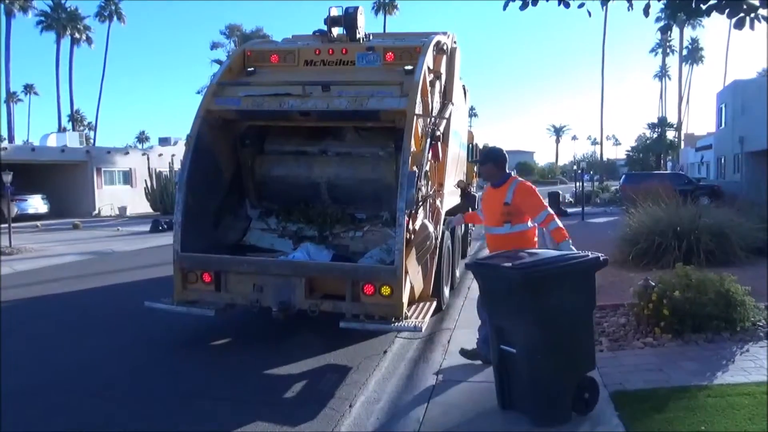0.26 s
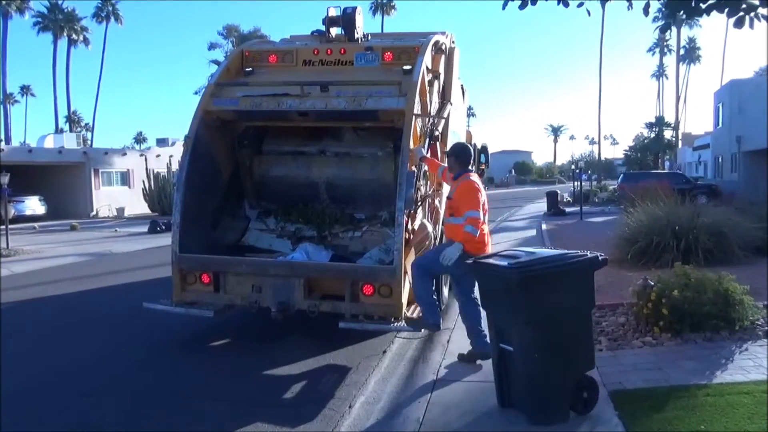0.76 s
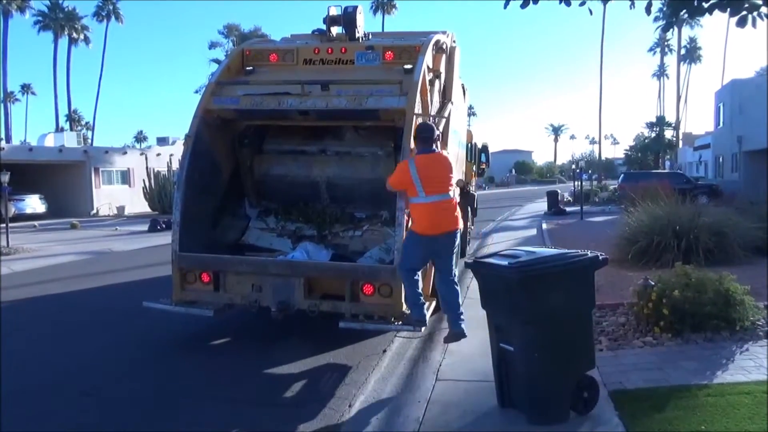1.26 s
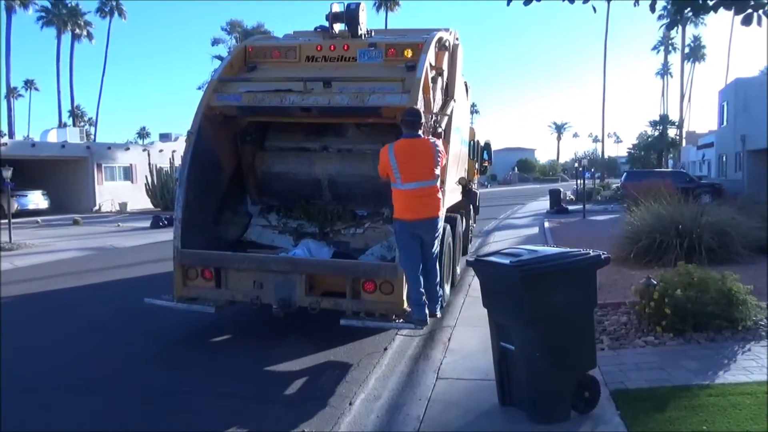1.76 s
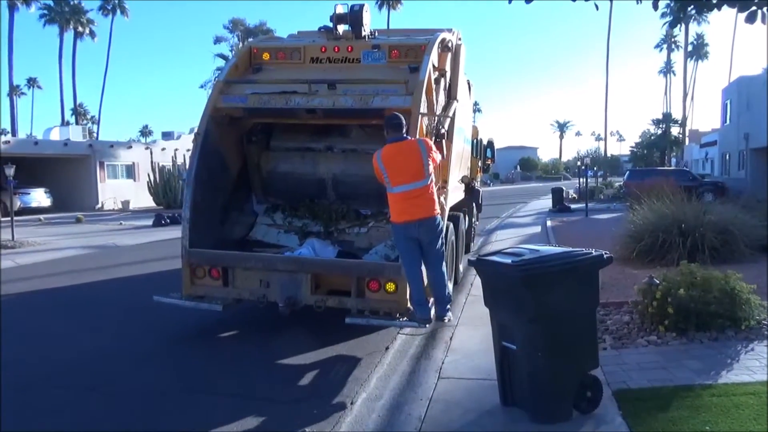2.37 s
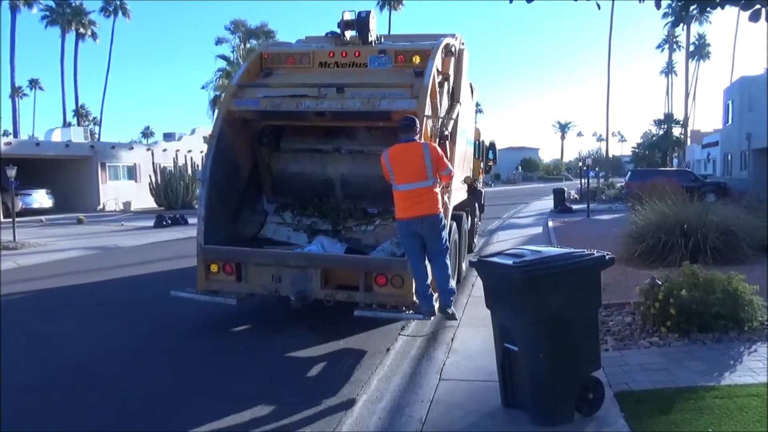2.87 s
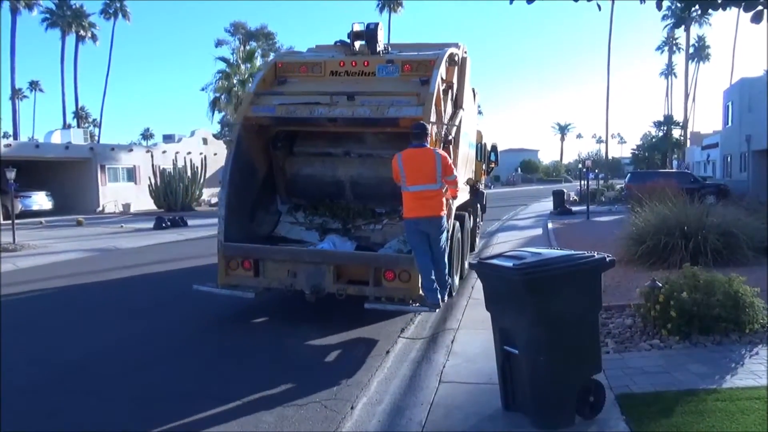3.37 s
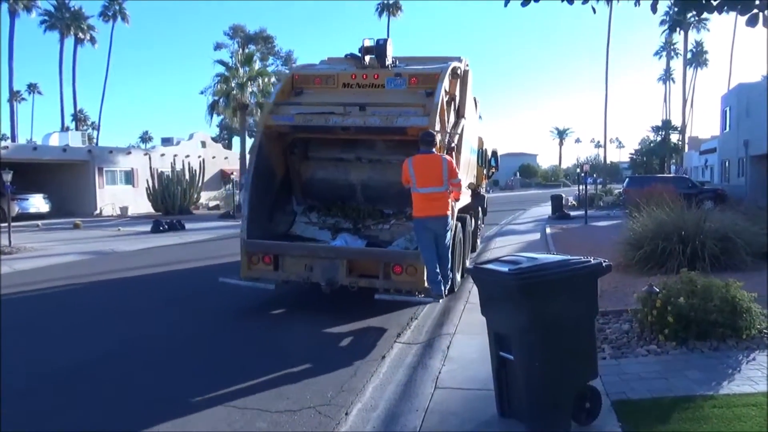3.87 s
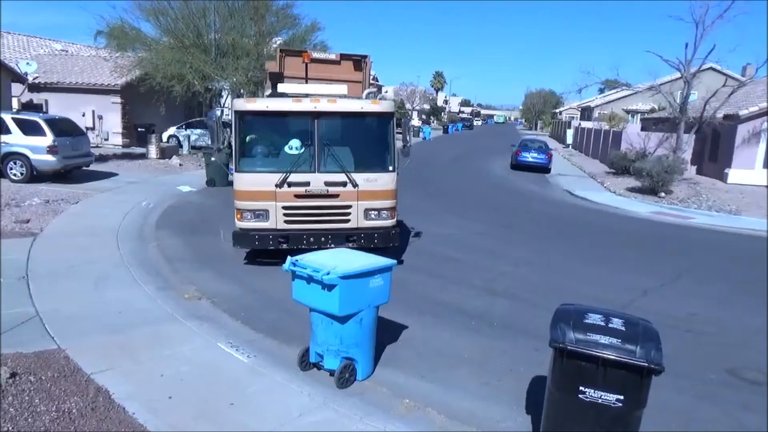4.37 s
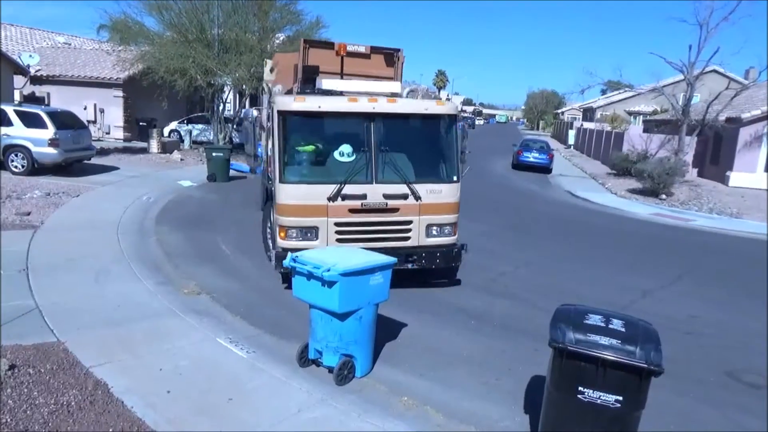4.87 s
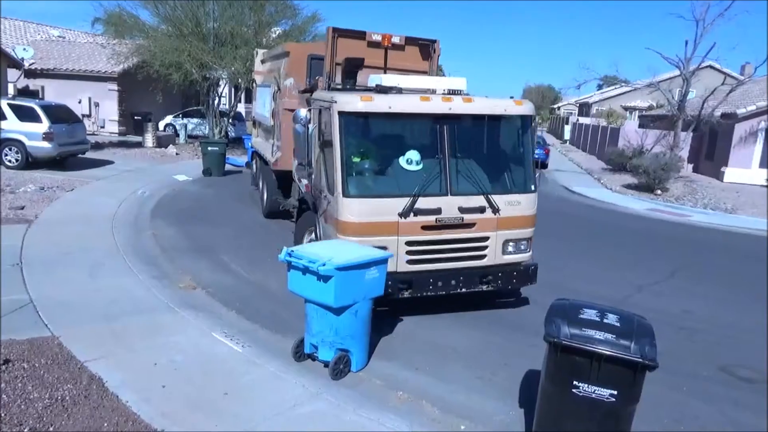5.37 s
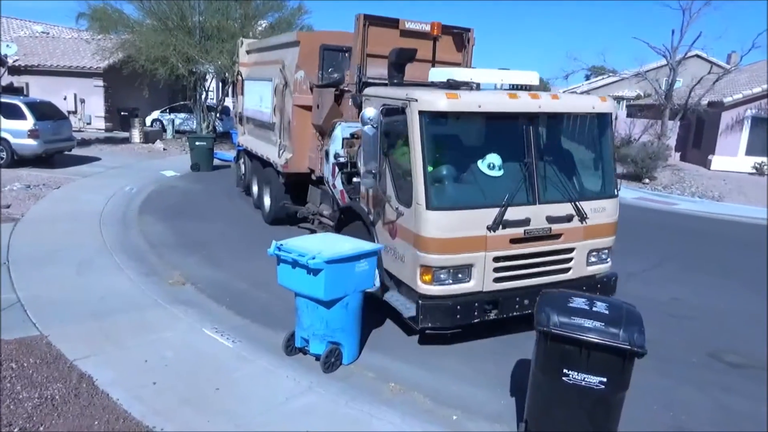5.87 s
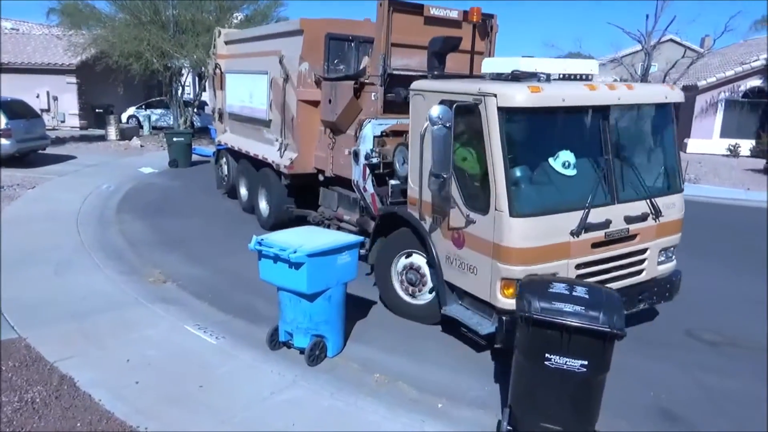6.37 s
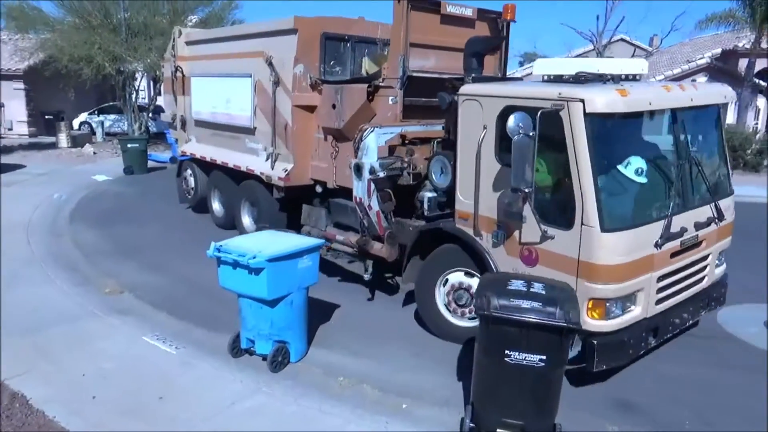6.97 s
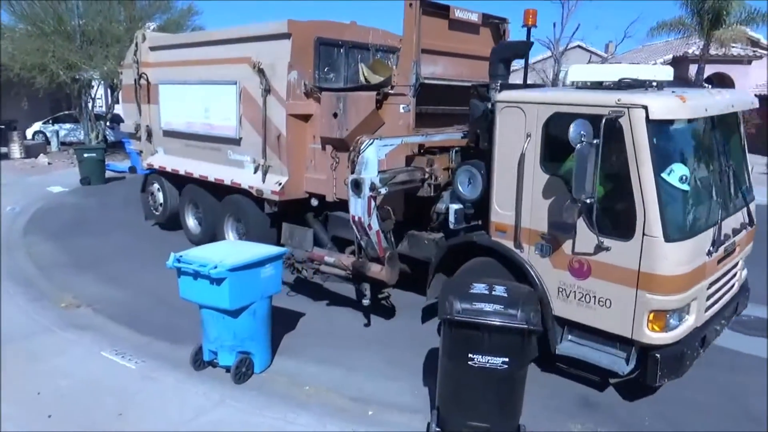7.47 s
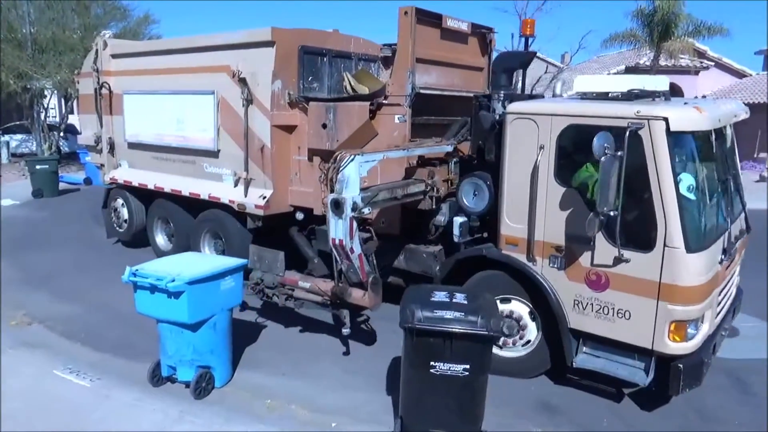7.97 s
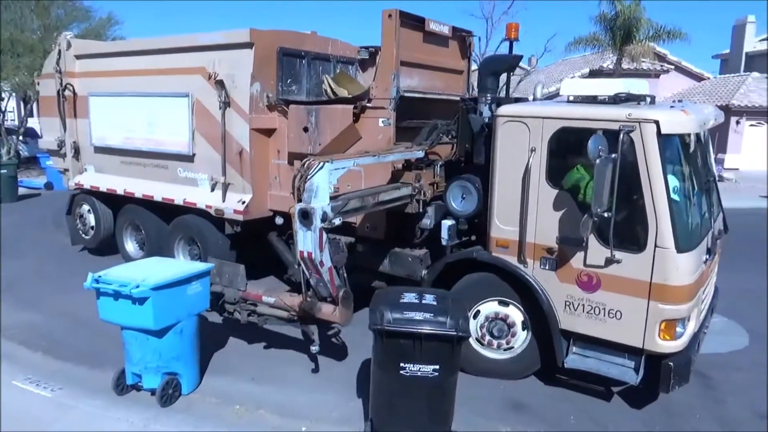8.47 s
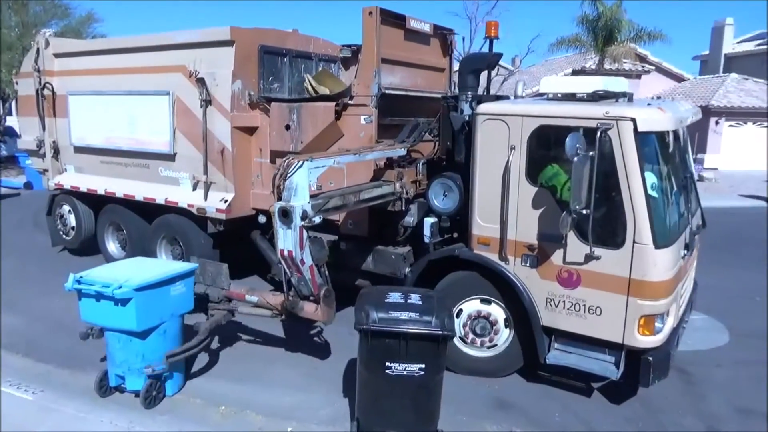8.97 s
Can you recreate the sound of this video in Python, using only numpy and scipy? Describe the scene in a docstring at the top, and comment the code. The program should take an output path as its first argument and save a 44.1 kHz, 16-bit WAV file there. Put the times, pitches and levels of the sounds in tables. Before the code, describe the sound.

A rear-loading garbage truck drones and bangs, sags, revs and pulls away; after a brief silence a second truck rattles up and brakes squealing.

```python
"""A street, with two diesel refuse trucks passing through it one after the other.
A rear loader drones at raised speed: shaft harmonics are weighted by exhaust resonances over filtered noise.
Its packer bangs and air hisses; the engine sags, then revs through the resonances and pulls away.
After a short silence a side loader rolls past close by, its clatter following distance and its gears whining.
It brakes to a stop with puffs of noise and bent-tone squeals, and its arm starts to move."""
import sys
import numpy as np
from scipy import signal
from scipy.fft import rfft, irfft, next_fast_len
from scipy.io import wavfile
from scipy.ndimage import uniform_filter1d

SR = 44100
rng = np.random.default_rng(int(sys.argv[2]) if len(sys.argv) > 2 else 0)


def unload_audio(sound):
    """Save the sound as a 16-bit wav file, at the path given as the first command line argument."""
    columns = np.transpose(np.atleast_2d(sound))
    # keep every value between -1 and 1, then stretch to whole-number steps
    steps = np.round(np.clip(columns, -1, 1) * 32767)
    wavfile.write(sys.argv[1], SR, steps.astype(np.int16))


N = 406602
LENGTH = next_fast_len(N, True)  # transform length in samples
T, HZ = np.arange(N) / SR, np.fft.rfftfreq(LENGTH, 1 / SR)
FIRST_ENDS_S, SECOND_STARTS_S = 4.236, 4.416

REAR_RUMBLE_DB, REAR_CLATTER_DB = -26, -38  # at the starting speed, before strain

# rear loader's engine speed: (t/s, firing rate f/Hz)
REAR_SPEED = [(0, 133.2), (.5, 133.3), (1.1, 136.1), (1.8, 137), (2.06, 135.5), (2.3, 121.3), (2.58, 108.7),
              (3.0, 156.2), (3.32, 179.9), (3.74, 163.6), (4.12, 165), (4.22, 157.7)]
# harmonics of the firing rate, from the first up: (level/dB)
DRONE_HARMONICS = [0, -16, -31]
# gears and pump: (multiple of the firing rate, level/dB at the starting speed)
GEAR_TONES = [(4.71, -45), (8.06, -47), (9.47, -47)]
# spectrum of the rumble: (f/Hz, level/dB)
REAR_RUMBLE_SPECTRUM = [(25, -24), (75, -1.5), (120, 2), (200, 3), (270, -1), (350, -1), (450, -16.5),
                        (2000, -64)]
# spectrum of the clatter: (f/Hz, level/dB)
REAR_CLATTER_SPECTRUM = [(250, -12), (480, -9), (640, -5.5), (850, -5.5), (1150, -8.5), (1700, -10.5),
                         (2700, -14.5), (3500, -13), (4600, -20.5), (6500, -25), (8700, -21),
                         (11000, -35.5)]
# low shudder of the chassis as the truck moves off: (t/s, level/dB)
CHASSIS_SHUDDER = [(2.2, -65.5), (2.65, -30.5), (3.25, -29.5), (3.9, -47)]


def rear_engine():
    """Harmonic synthesis: exhaust drone and gear tones share one shaft, over rumble and firing clatter."""
    hz = curves(REAR_SPEED)[0]
    drone_db, rumble_db, clatter_db = rear_levels(hz)
    turns = np.cumsum(hz * (1 + 0.00478 * drift(hz=20))) / SR  # counted in firings

    uneven = 1 + 0.158 * drift(hz=30.544)  # no two firings are equally strong
    drone = sum(amp(db) * np.sin(2 * np.pi * ((k + 1) * turns + rng.random()))
                for k, db in enumerate(DRONE_HARMONICS))
    gears = sum(amp(db + 2 * drift(hz=11)) * np.sin(2 * np.pi * k * turns) for k, db in GEAR_TONES)
    gear_gain = amp(0.21 * (clatter_db - REAR_CLATTER_DB))
    tones = np.sqrt(2) * (amp(drone_db) * uneven * drone + gear_gain * gears)

    beat = 1 + 0.15 * firing(turns, length=0.21)
    rumble = amp(rumble_db) * coloured(noise(side_db=-10) * beat, shape(REAR_RUMBLE_SPECTRUM))
    rattle = noise(side_db=-8.5) * beat * amp(0.92 * drift(hz=31.205))
    body = shape(REAR_CLATTER_SPECTRUM) * panels(depth_db=2.0, spacing_hz=35.136)
    clatter = amp(clatter_db) * coloured(rattle, body, band=(1300, 4000))

    # a slow shaft shakes the frame once and twice a turn
    sway = 2 * np.pi * turns * 0.31 + 0.63 * drift(hz=11.0)
    shudder_gain = amp(curves(CHASSIS_SHUDDER)[0]) * (1 + .5 * drift(hz=15))
    shudder = shudder_gain * (np.sin(sway) + np.sin(2 * sway))
    return tones + rumble + clatter + shudder


COAST_DB_PER_HZ_S = 0.0242  # the drone softens while the revs fall
RUMBLE_DB_PER_OCTAVE, CLATTER_DB_PER_OCTAVE = 2, 16.5  # growth with engine speed
LIFT_DB, LIFT_CLOSE_S, LIFT_T60_S = -10.5, 0.066, .25

# exhaust resonances, where the drone swells: (centre f/Hz, width f/Hz, level/dB)
EXHAUST_RESONANCES = [(116.97, 4.4, -18), (139.43, 4.83, -11.5), (163.83, 5.83, -12.5), (174.5, 9.7, -17)]
# the throttle closes for a moment and the drone drops away: (start t/s, length t/s)
THROTTLE_LIFTS = [(2.071, 0.258), (2.496, 0.277), (4.116, 0.13)]


def rear_levels(hz):
    """Resonance: exhaust peaks weight the drone, as speed, throttle and strain set the levels in dB."""
    pipe = sum(amp(db) ** 2 / (1 + (2 * (hz - centre) / width) ** 2)
               for centre, width, db in EXHAUST_RESONANCES)
    slowing = uniform_filter1d(np.maximum(-np.gradient(hz) * SR, 0), size=SR // 16)
    lifted = sum(swell(start, length, LIFT_CLOSE_S, LIFT_T60_S) for start, length in THROTTLE_LIFTS)
    drone_db = 10 * np.log10(pipe) - COAST_DB_PER_HZ_S * slowing + LIFT_DB * lifted

    octaves = np.log2(hz / hz[0])
    rumble_db = louder(REAR_RUMBLE_DB + RUMBLE_DB_PER_OCTAVE * octaves, strain_powers()[1])
    clatter_db = REAR_CLATTER_DB + CLATTER_DB_PER_OCTAVE * octaves
    return drone_db, rumble_db, clatter_db


# packer and body under load: (start t/s, length t/s, grinding level/dB, rumble level/dB)
BODY_STRAINS = [(.22, 0.065, -33.5, -19), (2.13, 0.27, -24.5, -28.5), (2.6, 0.51, -29.5, -28.5),
                (3.13, 0.39, -24.5, -20.5), (4.03, 0.113, -26.5, -22)]


def strain_powers():
    """Power summation: overlapping strains add as grinding power and rumble power."""
    return efforts(BODY_STRAINS, rise=0.107, t60=1.2)


# spectrum of the packer's grinding: (f/Hz, level/dB)
GRIND_SPECTRUM = [(200, -13.5), (355, -2), (480, -16.5), (740, -6), (1000, -7), (1350, -17), (3500, -27.5),
                  (9000, -38.5)]


def packer():
    """Sliding friction: steel slides and judders under load, its noise shaped by panel resonances."""
    rub = noise(side_db=-9) * amp(drift(hz=59.23))
    body = shape(GRIND_SPECTRUM) * panels(depth_db=2.5, spacing_hz=24.88)
    return np.sqrt(strain_powers()[0]) * coloured(rub, body)


TEETH_PER_FIRING = 32

# side loader's gear whine, which follows engine speed: (t/s, f/Hz)
GEAR_WHINE = [(4.4, 1405), (5.8, 1258), (6.4, 1247), (7.1, 1211), (7.6, 1227), (8.3, 1212)]
# its turbocharger runs down: (t/s, f/Hz, level/dB)
TURBO_RUNDOWN = [(5.4, 8780, -68), (5.85, 8300, -34), (6.15, 7680, -36), (7.1, 7250, -41), (7.3, 7080, -75)]
# spectrum of the side loader's body: (f/Hz, level/dB)
SIDE_SPECTRUM = [(25, -8), (45, -7.5), (80, -5), (140, -2), (210, -1.5), (300, -1), (450, -6), (660, 0),
                 (950, -2.5), (1260, -2), (1850, -6.5), (2700, -7), (3700, -12), (8100, -9.5),
                 (11000, -18.5)]


def side_engine():
    """Amplitude modulation: each firing rattles block and panels; gears and turbocharger sing above."""
    hz = curves(GEAR_WHINE)[0]
    rumble_db, clatter_db, whine_db, octave_db = side_levels()
    turns = np.cumsum(hz / TEETH_PER_FIRING * (1 + 0.014 * drift(hz=2))) / SR  # counted in firings
    rattle = (1 + 0.214 * firing(turns, length=0.416)) * amp(0.7 * drift(hz=198.16))

    # power shares of the bass and the treble
    body = shape(SIDE_SPECTRUM)
    low, high = 1 / (1 + (HZ / 370) ** 6), 1 / (1 + (3500 / (HZ + 1)) ** 6)
    rumble = coloured(noise(side_db=-13) * rattle, body * np.sqrt(low), band=(30, 350))
    rumble = amp(rumble_db + 3.0) * rumble
    throb = amp(rumble_db - 10.0) * np.sin(4 * np.pi * turns)  # exhaust hum at twice the firing rate

    # as the truck passes, the ringing panels of its front give way to those of its side
    aspect = np.pi / 2 * np.clip((T - SECOND_STARTS_S) / (STOP_S - SECOND_STARTS_S), 0, 1)
    middle = body * np.sqrt((1 - low) * (1 - high))
    faces = [middle * panels(depth_db=1.5, spacing_hz=22) for _ in range(2)]
    front, flank = (coloured(noise(side_db=-11) * rattle, face, band=(400, 3200)) for face in faces)
    surge_db = 0.545 * drift(hz=8.1)  # the load on the engine comes in small surges
    clatter = amp(clatter_db + surge_db) * (np.cos(aspect) * front + np.sin(aspect) * flank)

    # the treble grows faster than the clatter as the truck comes near
    fizz = noise(side_db=-13.5) * rattle * (1 + 0.193 * ticks(per_s=6.3, ring_s=0.0036))
    fizz = amp(1.1416 * clatter_db - 5.5) * coloured(fizz, body * np.sqrt(high))

    tones = whistle(hz, whine_db, waver=0.005123)
    tones = tones + whistle(2 * hz, octave_db, waver=0.0048)
    tones = tones + whistle(*curves(TURBO_RUNDOWN), waver=0.0038)
    return rumble + throb + clatter + fizz + street(tones, wet_db=-5.5, t60=1.0)


# the truck rolls by at an even speed, then brakes to a stop
AHEAD_M, PASSING_M, ROLL_M_PER_S = 6.737, 3.924, 3.141
BRAKE_S, STOP_S = 7.696, 7.7
SIDE_CLATTER_DB, SIDE_RUMBLE_DB, OCTAVE_DB = -18.5, -33, -42  # at the nearest point, before loads
WHINE_DB = -12  # relative to the unloaded clatter
RUMBLE_FALL_DB_PER_M = 0.37  # the rumble leaves through the grille and fades as that goes by
OCTAVE_GAIN_DB_PER_M = 1.28  # the whine's octave grows as the side of the truck comes into view
LOAD_RISE_S, LOAD_T60_S = 0.065, 1

# hydraulics load the engine: (start t/s, length t/s, added clatter level/dB, added rumble level/dB)
HYDRAULIC_LOADS = [(6.4, 0.42, -23.5, -33), (8.43, 0.169, -17.5, -42), (9.0, 0.165, -18.5, -23)]
# the octave of the whine sings out once before the stop: (start t/s, length t/s, level/dB)
OCTAVE_SINGING = [(7.04, .29, -28)]


def side_levels():
    """Inverse distance law: clatter and whine follow range; rumble and octave follow position, in dB."""
    speed = ROLL_M_PER_S * np.clip((STOP_S - T) / (STOP_S - BRAKE_S), 0, 1) * (T >= SECOND_STARTS_S)
    past_m = np.cumsum(speed) / SR - AHEAD_M  # negative while approaching
    near_db = SIDE_CLATTER_DB + 20 * np.log10(PASSING_M / np.hypot(past_m, PASSING_M))
    clatter_load, rumble_load = efforts(HYDRAULIC_LOADS, LOAD_RISE_S, LOAD_T60_S)
    singing = efforts(OCTAVE_SINGING, LOAD_RISE_S, LOAD_T60_S)[0]

    rumble_db = louder(SIDE_RUMBLE_DB - RUMBLE_FALL_DB_PER_M * past_m, rumble_load)
    octave_db = louder(OCTAVE_DB + OCTAVE_GAIN_DB_PER_M * past_m, singing)
    return rumble_db, louder(near_db, clatter_load), near_db + WHINE_DB, octave_db


def whistle(hz, db, waver):
    """Rotor tone: a sine at the passing rate, wavering in pitch and strength."""
    turns = np.cumsum(hz * (1 + waver * drift(hz=39.29))) / SR
    return np.sqrt(2) * amp(db + 2.93 * drift(hz=13.3)) * np.sin(2 * np.pi * turns)


SQUEAL_SWELL_S = .04  # or half the squeal, if that is shorter
BEND_RADIANS = 2.892  # the pitch arches away and most of the way back
STEADY_JITTER, JITTER_PER_BEND = .0006, .18  # rms share of the pitch; growth per relative bend

# brakes and dry pivots: (start t/s, length t/s, pitch f/Hz, bend f/Hz, peak level/dB before flutter)
BRAKE_SQUEALS = [(1.57, .1, 2000, 30, -33), (3.28, .11, 6020, 50, -20.5), (3.34, .11, 6020, 180, -19),
                 (3.405, .085, 6060, -80, -22), (3.45, .21, 5990, -70, -31), (4.03, .055, 6100, 400, -30),
                 (6.11, .11, 7560, -50, -27), (6.21, .075, 8680, -50, -26), (7.095, .09, 8570, -90, -10),
                 (7.165, .08, 8740, 130, -21), (7.21, .06, 9020, 60, -17.5), (7.62, .09, 9250, -40, -21),
                 (7.235, .395, 7555, 55, -11.5), (7.585, .24, 7590, -25, -11.5),
                 (7.78, .16, 7540, 40, -18.5), (7.915, .06, 9330, -30, -22), (7.945, .18, 6470, 15, -16),
                 (7.99, .075, 6480, 5, -4), (8.025, .09, 8810, -70, -18), (8.055, .085, 8530, 90, -13),
                 (8.06, .12, 9190, -30, -14), (8.14, .295, 9180, 25, -12), (8.08, .16, 7710, 25, -16.5),
                 (8.12, .15, 7510, 30, -18), (8.22, .19, 7740, 20, -20), (8.14, .08, 6925, 20, -12.5),
                 (8.205, .21, 8025, 10, -21), (8.23, .19, 8713, 10, -17), (8.23, .14, 10230, 110, -22),
                 (8.31, .19, 5762, -10, -24), (8.35, .095, 5757, 0, -9), (8.44, .05, 8030, 30, -19)]


def squeals():
    """Stick-slip: rubbing steel catches on successive modes; each swells, bends, flutters and lets go."""
    out = np.zeros(N)
    jitter, wander = drift(hz=260), 1 + .0008 * drift(hz=12)
    flutter = amp(1.2 * drift(hz=20))
    for start, length, hz, bend_hz, db in BRAKE_SQUEALS:
        at = (T >= start) & (T < start + length)
        shift = rng.integers(N)  # each squeal takes its own stretch of chance
        rough = STEADY_JITTER + JITTER_PER_BEND * abs(bend_hz) / hz
        arch = hz + bend_hz * np.sin(np.linspace(0, BEND_RADIANS, at.sum()))
        pitch = arch * np.roll(wander + rough * jitter, shift)[at]
        grip = signal.windows.tukey(at.sum(), 2 * SQUEAL_SWELL_S / length) * np.roll(flutter, shift)[at]
        out[at] += amp(db) * grip * np.sin(2 * np.pi * np.cumsum(pitch) / SR)
    return street(out, wet_db=-13, t60=.4)


KNOCK_S, CRACK_T60_S = .3, 0.0752
CROWDING = 0.1025  # each mode is a cluster of close ones: its width as a share of its pitch

# blows; the large panels boom low: (t/s, ring level/dB, crack level/dB, main pitch f/Hz)
STEEL_KNOCKS = [(.007, -25, -27.5, 892.5), (.048, -11.5, -40, 823), (.225, -18, -24, 683),
                (.257, -12, -35, 640.4), (.281, -16.5, -46, 879.5), (.302, -18.5, -30, 696),
                (.318, -12, -28, 750), (.359, -16.5, -34.5, 885), (1.75, -19, -21.5, 750.7),
                (3.209, -20.5, -21.5, 748), (3.6, -21, -21.5, 764.5), (4.05, -16.5, -41.5, 764),
                (4.122, -12, -36.5, 315.8), (4.188, -14.5, -30.5, 328.7), (6.385, -10, -39, 228.5),
                (6.882, -11, -37, 289), (6.953, -11, -39.5, 297.2), (7.013, -14, -19.5, 797),
                (8.428, -14, -14, 791.5), (8.701, -30, -15.5, 750), (9.008, -30, -17, 751)]
# modes of a struck panel: (multiple of the main pitch, level/dB, t60 t/s)
PANEL_MODES = [(0.611, -15, 0.17), (0.881, -7.5, .08), (0.998, -4, 0.095), (1.21, -12, 0.145),
               (1.7, -10, 0.076), (2.3, -15, 0.072)]
# spectrum of the crack: (f/Hz, level/dB)
CRACK_SPECTRUM = [(80, -8), (500, -2.5), (1500, 6.5), (3300, 4.5), (11000, -8.5)]


def knocks():
    """Modal synthesis: a blow cracks and rings the crowded modes of a steel panel; the street echoes both."""
    ring, crack = np.zeros((2, N))
    for s, ring_db, crack_db, main_hz in STEEL_KNOCKS:
        at = (T >= s) & (T < s + KNOCK_S)
        t = T[at] - s
        for ratio, db, t60 in PANEL_MODES:
            hz = ratio * main_hz
            # a random walk in phase spreads the mode over its width
            walk = np.cumsum(rng.standard_normal(len(t))) * np.sqrt(CROWDING * hz / (2 * np.pi * SR))
            envelope = amp(ring_db + db - 60 * t / t60) * (1 - np.exp(-t / 0.0017))
            ring[at] += envelope * np.sqrt(2) * np.sin(2 * np.pi * (hz * t + walk))
        crack[at] += amp(crack_db - 60 * t / CRACK_T60_S) * (1 - np.exp(-t / 0.00071))
    snap = coloured(rng.standard_normal((1, N)), shape(CRACK_SPECTRUM))[0]
    return street(ring + crack * snap, wet_db=-4.5, t60=0.3)


# a longer vent opens more slowly and takes longer to empty
AIR_RISE_SHARE, AIR_T60_S, AIR_T60_PER_OPEN = 0.323, 0.0459, 3.86

# air valves: (t/s, level/dB, open time t/s)
AIR_VENTS = [(1.28, -19.5, 0.1685), (3.175, -25.5, 0.0364), (3.19, -28, 0.44), (4.04, -29, 0.053),
             (6.279, -7, .016), (6.352, -7, .018), (6.6, -20, 0.075), (6.757, -18, 0.008),
             (6.85, -22.5, 0.014), (8.576, -20, 0.0299)]
# spectrum of the jet: (f/Hz, level/dB)
AIR_SPECTRUM = [(700, -30), (1800, -6), (2800, -4.5), (5300, -6), (8600, 1), (11000, -7)]


def air():
    """Jet noise: valves open, vent a sputtering jet of air and die away."""
    power = 0
    for s, db, length in AIR_VENTS:
        vent = swell(s, length, AIR_RISE_SHARE * length, AIR_T60_S + AIR_T60_PER_OPEN * length)
        power = power + (amp(db) * vent) ** 2
    sputter = noise(side_db=-14) * amp(1.2 * drift(hz=200))
    return np.sqrt(power) * coloured(sputter, shape(AIR_SPECTRUM))


GROAN_JITTER = .025  # rms share of the pitch

# hydraulics and joints: (start t/s, length t/s, from f/Hz, to f/Hz, level/dB)
JOINT_GROANS = [(2.15, .29, 770, 730, -28), (3.23, .33, 3450, 3550, -34), (4.05, .12, 3500, 3450, -28.5),
                (6.38, .09, 1240, 1520, -21.5), (6.56, .08, 790, 680, -21), (6.62, .08, 1000, 1380, -21),
                (6.67, .16, 790, 560, -21.5), (6.86, .16, 620, 720, -24.5), (8.49, .1, 1350, 1080, -20),
                (9.005, .028, 1950, 2000, -21)]


def groans():
    """Frequency modulation: loaded hydraulics and joints groan and rasp as rough, gliding tones."""
    out = np.zeros(N)
    jitter, grip = drift(hz=180), amp(2.5 * drift(hz=70))
    for start, length, from_hz, to_hz, db in JOINT_GROANS:
        at = (T >= start) & (T < start + length)
        pitch = np.linspace(from_hz, to_hz, at.sum()) * (1 + GROAN_JITTER * jitter[at])
        envelope = amp(db) * signal.windows.tukey(at.sum()) * grip[at]
        out[at] += envelope * np.sin(2 * np.pi * np.cumsum(pitch) / SR)
    return street(out, wet_db=-6, t60=.3)


CLICK_T60_S, CLINK_S = .06, 6.279  # decay of a click; moment of the clink

# latches: (t/s, level/dB)
LATCH_CLICKS = [(1.031, -31), (1.719, -26), (2.623, -30), (3.955, -17), (6.503, -11)]
# modes of the clinking valve: (f/Hz, level/dB, t60 t/s)
VALVE_MODES = [(3100, -14, .18), (4210, -16, .16), (5100, -7, .05), (5680, -16, .16)]


def fittings():
    """Impulse response: small latches click brightly, and a valve clinks in its modes as it snaps open."""
    bright = unit(np.diff(rng.standard_normal(N + 1)))  # differencing lifts the treble
    clicks = sum(amp(db) * swell(s, 0, .001, CLICK_T60_S) for s, db in LATCH_CLICKS) * bright
    clink = sum(amp(db) * swell(CLINK_S, 0, .002, t60) * np.sin(2 * np.pi * hz * T)
                for hz, db, t60 in VALVE_MODES)
    return clicks + clink


# six cylinders in turn: (relative strength of the firing)
CYLINDER_STRENGTHS = [2.1, 1.1, 0.92, 0.32, 0.776, 0.46]


def firing(turns, length):
    """Periodic excitation: a burst at each firing decays within the cycle; the six cylinders differ."""
    strength = np.take(CYLINDER_STRENGTHS, turns.astype(int) % len(CYLINDER_STRENGTHS))
    return unit(strength * np.exp(-(turns % 1) / length))


def ticks(per_s, ring_s):
    """Poisson process: loose parts tick at random; most are small, a few are large."""
    size = rng.exponential(1, N) * (rng.random(N) < per_s / SR)
    return signal.lfilter([1], [1, -np.exp(-1 / (ring_s * SR))], np.minimum(size, 2))


def panels(depth_db, spacing_hz):
    """Modal density: the many narrow resonances of a truck body, as ripples on a spectrum."""
    knots = rng.standard_normal(SR // 10)
    return amp(depth_db * np.interp(HZ / spacing_hz, np.arange(len(knots)), knots))


def street(x, wet_db, t60):
    """Reverberation: direct sound plus scattered echoes from road and house fronts."""
    t = T[:SR // 2]
    sparse = rng.random((2, len(t))) < .05
    taps = rng.standard_normal((2, len(t))) * sparse * amp(-60 * t / t60) * (t > .004)
    taps /= np.linalg.norm(taps, axis=1, keepdims=True)
    return x + amp(wet_db) * signal.fftconvolve(x[None], taps, axes=1)[:, :N]


def noise(side_db):
    """Interaural coherence: white noise, partly alike in both ears."""
    middle, side = rng.standard_normal((2, N))
    return middle + amp(side_db) * np.array([side, -side])


def drift(hz):
    """Band-limited chance: a slow random curve of rms one, up to a given rate."""
    knots = rng.standard_normal(N // 20)
    return unit(np.interp(T * 2 * hz, np.arange(len(knots)), knots))


def swell(start, length, rise, t60):
    """Exponential decay: an envelope rises and, from the end of its length, dies away."""
    t = T - start
    return np.clip(t / rise, 0, 1) * amp(-60 * np.clip((t - length) / t60, 0, 2))


def efforts(rows, rise, t60):
    """Power summation: a table of swells gives one power curve for each level column."""
    return sum(np.outer(amp(dbs), swell(start, length, rise, t60)) ** 2 for start, length, *dbs in rows)


def louder(db, power):
    """Incoherent addition: a level in dB with more power on top."""
    return 10 * np.log10(amp(db) ** 2 + power)


def amp(db):
    """Level definition: decibels to amplitude gain."""
    return 10 ** (np.asarray(db) / 20)


def unit(x):
    """Normalisation: scales to an rms of one."""
    return x / np.sqrt(np.mean(x ** 2) + 1e-20)


def curves(rows):
    """Linear interpolation: each column of a table as a curve in time."""
    s, *columns = np.transpose(rows)
    return [np.interp(T, s, c) for c in columns]


def shape(points):
    """Spectral envelope: gain at every frequency, interpolated in dB over log frequency."""
    f, db = np.transpose(points)
    return amp(np.interp(np.log(HZ + 1), np.log(f), db))


def coloured(x, gain, band=(0, SR / 2)):
    """Parseval's theorem: filters x and gives it an rms of one within a band."""
    z = rfft(x, LENGTH) * gain
    power = abs(z[:, (HZ >= band[0]) & (HZ <= band[1])]) ** 2
    return irfft(z, LENGTH)[:, :N] * N / np.sqrt(power.sum())


def limiter(x, threshold_db, share):
    """Dynamic compression: a fast treble-weighted detector lets squeals and air jets push the engine down."""
    treble = np.diff(x.mean(0), prepend=0)
    power = signal.lfilter([1 / 300], [1, 1 / 300 - 1], treble ** 2)  # averages over about 300 samples
    excess_db = np.maximum(10 * np.log10(power + 1e-12) - threshold_db, 0)
    return x * amp(-share * excess_db)


def scene():
    """Superposition: the first truck, a moment of silence, the second truck."""
    first = np.clip((FIRST_ENDS_S - T) / 0.0154, 0, 1)
    second = T >= SECOND_STARTS_S
    details = squeals() + groans() + air() + knocks() + fittings()
    return first * (rear_engine() + packer()) + second * side_engine() + (first + second) * details


LEAD_RADIANS, LEAD_FADES_HZ = .9, 900  # left over right at the lowest pitch; halved at this frequency
EDGE_HZ = 11130


def record(dry):
    """Interchannel phase: the left leads in the bass; then limiting, rounded peaks and a steep low-pass."""
    lead = LEAD_RADIANS / (1 + HZ / LEAD_FADES_HZ)
    pair = irfft(rfft(dry, LENGTH) * np.exp(.5j * np.array([lead, -lead])), LENGTH)[:, :N]
    held = limiter(pair, threshold_db=-17, share=.7)
    leaning = held * amp([[.15], [-.15]])  # slightly to the left
    rounded = leaning / (1 + (leaning / .75) ** 6) ** (1 / 6)
    low_pass = signal.firwin(1201, EDGE_HZ, window=("kaiser", 9), fs=SR)
    return signal.oaconvolve(rounded, low_pass[None], "same")


dry = scene()
out = record(dry)
unload_audio(out)
```